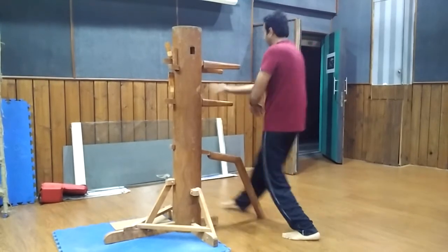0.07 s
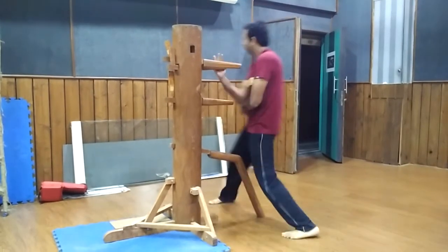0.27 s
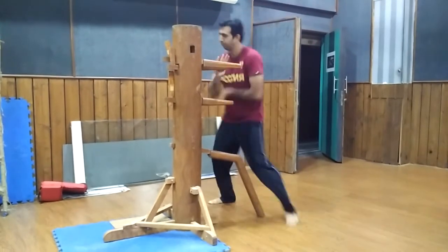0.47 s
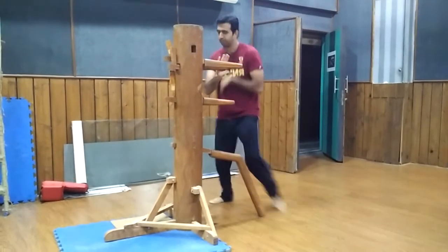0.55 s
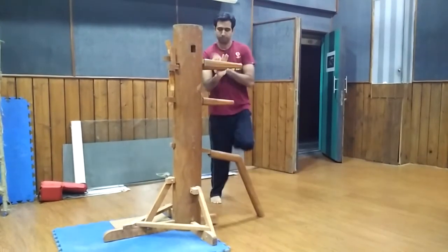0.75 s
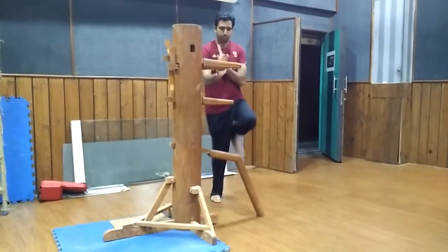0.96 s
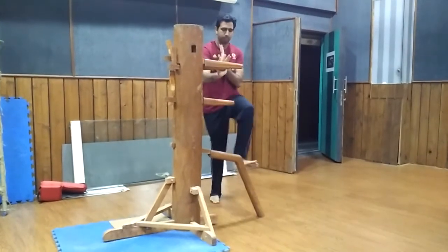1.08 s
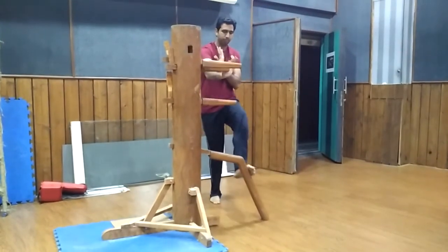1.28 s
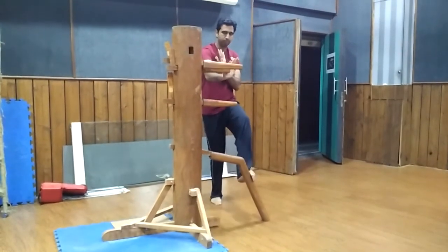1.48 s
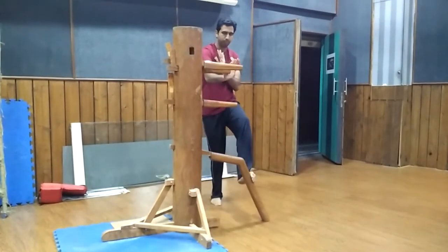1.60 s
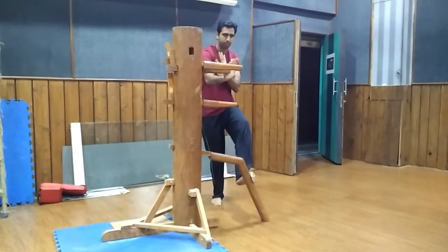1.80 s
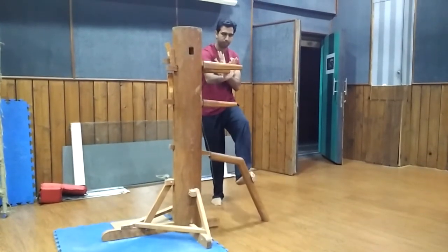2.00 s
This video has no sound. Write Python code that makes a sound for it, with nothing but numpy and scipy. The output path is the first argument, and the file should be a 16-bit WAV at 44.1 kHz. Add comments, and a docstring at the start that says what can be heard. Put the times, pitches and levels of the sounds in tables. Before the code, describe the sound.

A wooden training dummy is struck twice in an echoing hall. A palm cracks against its arm with a quick rattle, a bare foot faintly swishes over the floor, then a kick knocks its leg. Both blows slightly overload the microphone.

```python
"""A panelled hall, where a wooden training dummy is struck twice: a palm on an arm, a kick on the leg.
Each blow is a slap of skin and a ring of wood, and each loose part knocks again in its socket.
Between the blows a bare foot lands with a soft boom and slides over the boards.
The hall rings on over its quiet air and low hum, and the loud blows overload the microphone input."""
import sys
import numpy as np
from scipy import signal
from scipy.fft import rfft, irfft, next_fast_len
from scipy.io import wavfile
from scipy.ndimage import uniform_filter1d

SR = 44100
rng = np.random.default_rng(int(sys.argv[2]) if len(sys.argv) > 2 else 0)


def generate_wav(sig):
    """Save sig (samples, or channels by samples) to the path in sys.argv[1] as 16-bit PCM at SR."""
    pcm = np.round(np.clip(np.atleast_2d(sig).T, -1, 1) * 32767).astype(np.int16)
    wavfile.write(sys.argv[1], SR, pcm)


N = 90404


def amp(db):
    return 10 ** (np.asarray(db) / 20)


def unit_rms(x):
    return x / np.sqrt(np.mean(x ** 2) + 1e-20)


def add(mix, start_s, sound):
    at = round(start_s * SR)
    mix[..., at:at + sound.shape[-1]] += sound


def curve_at(points, hz):
    """Reads a curve along a log frequency axis."""
    point_hz, value = np.transpose(points)
    return np.interp(np.log(hz + 1), np.log(point_hz + 1), value)


def tone_filter(points, size=4096):
    """A minimum-phase click with the given spectrum and unit energy."""
    log_gain = np.log(amp(curve_at(points, abs(np.fft.fftfreq(size, 1 / SR)))))
    taps = np.fft.ifft(np.exp(np.conj(signal.hilbert(log_gain)))).real[:size // 2]
    return taps / np.linalg.norm(taps)


# The hall's stereo image. Each row: frequency in Hz, left-right correlation.
STEREO_LIKENESS = [(60, 0.15), (130, 0.54), (290, .9), (600, 0.73), (850, .55), (1100, 0.16), (1400, 0.1),
                   (3000, 0.076), (14400, -.02)]
def stereo_image(spectra, hz):
    """Blends left into right: the low mids sit near the centre, the treble stays wide."""
    left, right = spectra
    likeness = np.clip(curve_at(STEREO_LIKENESS, hz), -1, 1)[:, None]
    return np.array([left, likeness * left + np.sqrt(1 - likeness ** 2) * right])


# Room tone. Each row: frequency in Hz, relative level in dB.
AIR_TONE = [(20, -22), (45, -13.5), (80, -14), (180, -11.5), (280, -13), (420, -9), (800, -12.5),
            (1600, -15), (4000, -23), (6500, -28.5), (9000, -22), (14000, -34.5)]
def hall_air(level_db=-65, drift_db=1.5):
    """A quiet bed of noise whose colour drifts in patches."""
    shape, hz = (513, N // 256 + 5), np.fft.rfftfreq(1024, 1 / SR)
    noise = rng.standard_normal((2, *shape)) + 1j * rng.standard_normal((2, *shape))
    patches = uniform_filter1d(rng.standard_normal(shape), 8, axis=0)
    patches = unit_rms(uniform_filter1d(patches, 12, axis=1))
    spectra = stereo_image(noise, hz) * amp(curve_at(AIR_TONE, hz)[:, None] + drift_db * patches)
    return amp(level_db) * unit_rms(signal.istft(spectra, nperseg=1024, noverlap=768)[1][:, :N])


# The hum's fader moves, in three groups. Each row: time in seconds, lower note in dB, upper note in dB.
HUM_SWELLS = [
    [(0.0, -77, -97), (0.018, -86, -74), (0.102, -99, -70.5), (0.116, -65.5, -120), (0.2, -89, -85)],
    [(0.75, -87, -78), (0.996, -72, -91), (1.03, -84.5, -107), (1.11, -66, -68.5), (1.2, -68, -71.5)],
    [(1.7, -79, -74), (1.754, -84, -93), (1.784, -72.5, -68.5), (1.894, -102, -63), (2.05, -84, -72)],
]
def hall_hum(notes_hz=(135, 182), fuzz_width_hz=12):
    """Two low notes swell and fade, made fuzzy by a wandering phase."""
    t, hum = np.arange(N) / SR, np.zeros(N)
    times, *faders = np.concatenate(HUM_SWELLS).T
    pole = np.exp(-np.pi * fuzz_width_hz / SR)
    for hz, db in zip(notes_hz, faders):
        wobble = unit_rms(signal.lfilter([1], [1, -pole], rng.standard_normal(N)))
        hum += amp(np.interp(t, times, db)) * np.sqrt(2) * np.cos(2 * np.pi * hz * t + .8 * wobble)
    return hum


# The post's body, under every knock. Each row: pitch in Hz, bandwidth in Hz, relative level in dB.
POST_MODES = [(240, 41, -6), (350, 120, -7.5)]
def wood_ring(part_modes, t, low_cut_hz=190):
    """Post and struck part ring in damped modes; the wood is too small to radiate deep bass."""
    ring = np.zeros_like(t)
    for k, (hz, width, db) in enumerate(POST_MODES + part_modes):
        decay = np.sqrt(width) * np.exp(-np.pi * width * t)
        ring += (-1) ** k * amp(db) * decay * np.sin(2 * np.pi * hz * t)
    ring = signal.sosfilt(signal.butter(3, low_cut_hz, "high", fs=SR, output="sos"), ring)
    return ring / np.linalg.norm(ring)


def stand_thump(t, hz=66, width_hz=73):
    """The dummy's stand thumps the floor."""
    thump = t * np.exp(-np.pi * width_hz * t) * np.sin(2 * np.pi * hz * t)
    return thump / np.linalg.norm(thump)


def close_slap(click, length_s):
    """Heard from nearby, a slap is a short rough burst in the colour of its click."""
    t = np.arange(2000) / SR
    burst = rng.standard_normal((2, t.size)) * t * np.exp(-2 * t / length_s)
    return signal.fftconvolve(burst / np.linalg.norm(burst[0]), click[None], axes=1)


def knocks(hits, modes, slap_tone, gain_db=5.5, thump_db=-31, right_lag_s=.00024):
    """Each hit rings and slaps, close up and through the hall; its thump feeds only the hall."""
    t, send, direct = np.arange(6000) / SR, np.zeros(N), np.zeros((2, N))
    ring, thump, click = wood_ring(modes, t), stand_thump(t), tone_filter(slap_tone)
    for start_s, wood_db, slap_db, length_s in hits:
        wood = amp(gain_db + wood_db) * ring
        slap = amp(gain_db + slap_db) * click
        add(send, start_s, wood + amp(thump_db + wood_db) * thump)
        add(send, start_s, slap)
        add(direct, start_s, amp(3.5) * wood)
        add(direct, start_s, amp(-3.5) * close_slap(slap, length_s))
    direct[1] = np.roll(direct[1], round(right_lag_s * SR))  # reaches the right microphone later
    return direct + hall_reverb(send)


# Touch, blow and rattles on the arm.
# Each row: start in seconds, relative wood and slap levels in dB, slap length in seconds.
ARM_CUES = [(.228, -45.5, -18.5, 0.0031), (.2392, -6, -3.5, 0.0036), (.2435, 9, 10.5, .004),
            (.258, -1, -7.5, .003), (.270, -3, -5, .004), (.355, -13, -34.5, 0.0049)]
# The arm's ring. Each row: pitch in Hz, bandwidth in Hz, relative level in dB.
ARM_MODES = [(800.4, 58, 8), (1055, 60, -3), (1566, 86, -4.5), (1523, 40, 2), (1845, 27, 3.5),
             (1962, 37, 11), (2643, 70, -3.5), (2845, 110, 8), (4268, 73, -8), (5390, 83, -8),
             (6500, 150, -4.5), (8960, 910, -12.5)]
# The palm's slap. Each row: frequency in Hz, relative level in dB.
PALM_TONE = [(30, -57.5), (120, -36.5), (200, -30), (400, -21.5), (1200, -3.5), (3400, -10), (6000, -18),
             (9000, -12), (11000, -16.5), (14500, -19)]
def palm_on_arm():
    """A palm cracks against the wooden arm, which rattles in its socket."""
    return knocks(ARM_CUES, ARM_MODES, PALM_TONE)


# The hall's tail. Each row: frequency in Hz, seconds to fall by 60 dB.
HALL_DECAY = [(60, 1.1), (120, 0.73), (240, .45), (420, 0.63), (800, 0.52), (1400, 0.55), (2000, 0.57),
              (3000, 0.5), (5000, 0.53), (8000, 0.42), (13000, 0.29)]
def hall_reverb(send, gain_db=7, gap_s=.00067, build_s=.004):
    """Sparse reflections off the panels build up, then die away band by band."""
    taps = np.zeros((2, SR))
    slots = np.arange(0, SR - 20, 20)  # one reflection in every 20 samples
    arrivals = slots + rng.integers(0, 20, (2, slots.size))
    np.put_along_axis(taps, arrivals, rng.choice([-1., 1.], arrivals.shape), 1)
    hz, t, spectra = signal.stft(taps, SR, nperseg=512)
    decay = amp(-60 * t / curve_at(HALL_DECAY, hz)[:, None])
    tail = signal.istft(stereo_image(spectra, hz) * decay, SR, nperseg=512)[1][:, :SR]
    tail *= np.clip((np.arange(SR) / SR - gap_s) / build_s, 0, 1)
    return amp(gain_db) * signal.fftconvolve(send[None], tail / np.linalg.norm(tail[0]), axes=1)[:, :N]


def footstep(start_s=.47, peak_db=-66, hz=68.6, width_hz=9):
    """One soft step booms in the floor."""
    age = np.maximum(np.arange(N) / SR - start_s, 0)
    rise = np.pi * width_hz * age
    return amp(peak_db) * rise * np.exp(1 - rise) * np.sin(2 * np.pi * hz * age)


# The slide's fader. Each row: time in seconds, relative level in dB.
SLIDE_FADER = [(0, -63), (.1, -87), (.5, -82.5), (.55, -46.5), (.61, -39.5), (.65, -55), (.72, -62.5),
               (.84, -65), (.89, -90.5)]
# The sole's bright hiss. Each row: frequency in Hz, relative level in dB.
SOLE_TONE = [(1470, -29.5), (2500, -10.5), (3660, -8.5), (4000, -7), (4740, -10.5), (5570, -5.5),
             (6180, -11.5), (8670, -9.5), (14500, -15.5)]
def foot_slide(trim_db=-7):
    """A bare sole hisses over the boards in fine grains, and the hall answers."""
    grit = rng.standard_normal(N) * amp(1.1 * rng.exponential(1, N))
    tone = tone_filter([(1200, -32)] + SOLE_TONE)  # the added point shelves off the lows
    fader_db = np.interp(np.arange(N) / SR, *np.transpose(SLIDE_FADER))
    hiss = unit_rms(np.convolve(grit, tone)[:N]) * amp(fader_db + trim_db)
    return hiss + hall_reverb(hiss)


# A faint rising hiss, then the blow and rattles on the leg.
# Each row: start in seconds, relative wood and slap levels in dB, slap length in seconds.
LEG_CUES = [(1.2295, -45.5, -5.5, 0.0068), (1.2362, 7.5, 7, 0.004), (1.248, -12, -20.5, 0.0085),
            (1.257, -8, -19, 0.0026), (1.272, -4.5, -37, 0.0071)]
# The leg's ring. Each row: pitch in Hz, bandwidth in Hz, relative level in dB.
LEG_MODES = [(723, 87, 0), (843, 29, -3), (1187, 68, 1.5), (1414, 130, 9.5), (1540, 140, -21.5),
             (1971, 31, 5), (2550, 300, -8), (2836, 32, 1), (4330, 190, -15), (4870, 79, -7),
             (5530, 89, -15), (8430, 300, -40.5)]
# The kick's fuller slap. Each row: frequency in Hz, relative level in dB.
KICK_TONE = [(30, -61), (120, -22), (200, -18.5), (400, -15), (1200, -4.5), (3400, -10.5), (6000, -23),
             (9000, -18), (11000, -20.5), (14500, -25.5)]
def kick_on_leg():
    """A kick smacks the wooden leg, which knocks again in its socket."""
    return knocks(LEG_CUES, LEG_MODES, KICK_TONE)


def scene():
    """Palm, footwork and kick over the hall's quiet bed."""
    return hall_air() + hall_hum() + palm_on_arm() + footstep() + foot_slide() + kick_on_leg()


# The microphones' balance. Each row: frequency in Hz, left minus right in dB.
MIC_BALANCE = [(60, -2), (110, -0.5), (200, -2.5), (370, -0.5), (690, -0.5), (1260, -0.5), (2320, 3),
               (4260, 1), (7820, 7.5), (14400, 1.5)]
# Dips shared by both microphones. Each row: frequency in Hz, gain in dB.
MIC_DIPS = [(2900, -0.5), (3250, -2), (3450, -7), (3700, 0), (4000, 1), (10300, 0), (11200, -3.5),
            (12200, 0)]
def record(dry, knee=5, high_cut_hz=14300):
    """Two unequal microphones, a soft overload at full scale, then a steep high cut."""
    size = next_fast_len(N + 2048)
    hz = np.fft.rfftfreq(size, 1 / SR)
    tilt, dips = curve_at(MIC_BALANCE, hz) / 2, curve_at(MIC_DIPS, hz)
    coloured = irfft(rfft(dry, size) * amp([dips + tilt, dips - tilt]), size)[:, :N]
    clipped = coloured / (1 + abs(coloured) ** knee) ** (1 / knee)
    high_cut = signal.firwin(511, high_cut_hz, window=("kaiser", 9), fs=SR)
    return signal.oaconvolve(clipped, high_cut[None], "same")


dry = scene()
out = record(dry)
generate_wav(out)
```